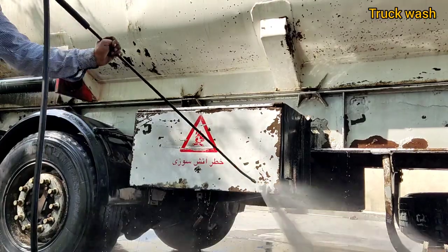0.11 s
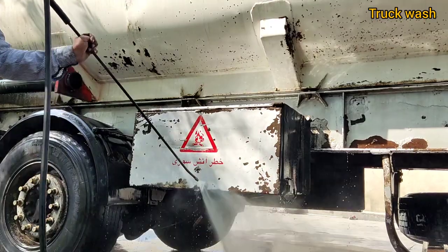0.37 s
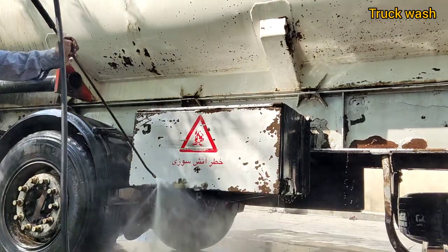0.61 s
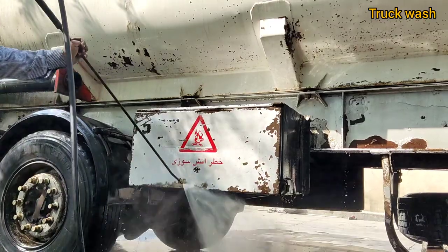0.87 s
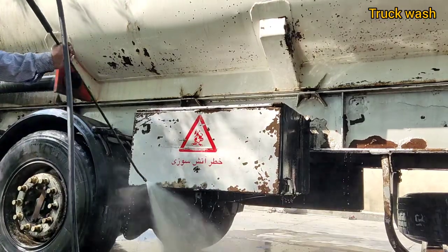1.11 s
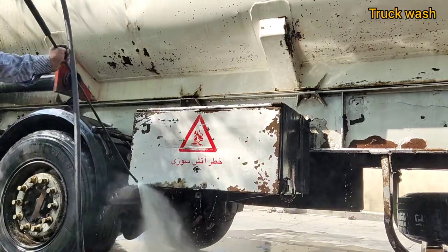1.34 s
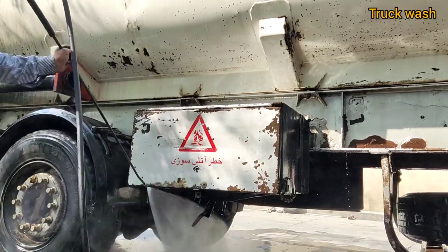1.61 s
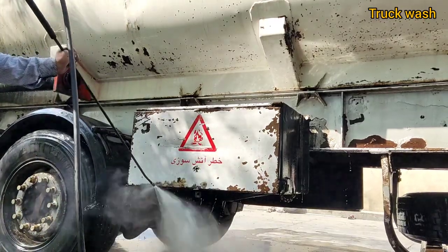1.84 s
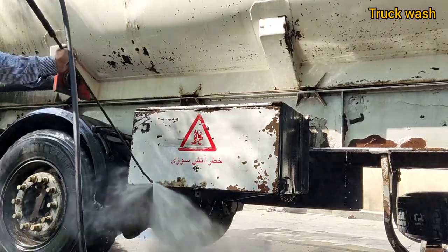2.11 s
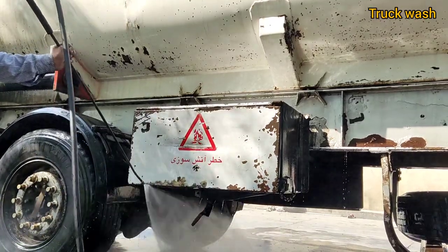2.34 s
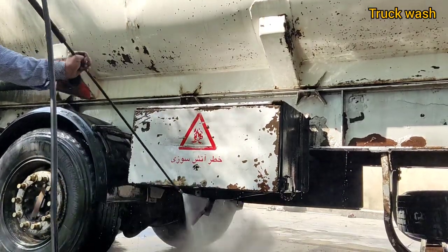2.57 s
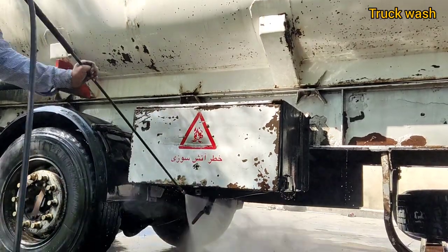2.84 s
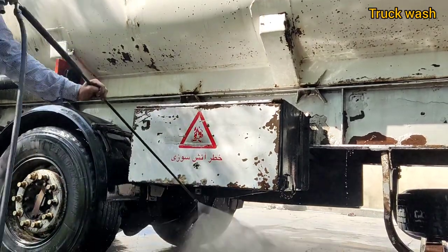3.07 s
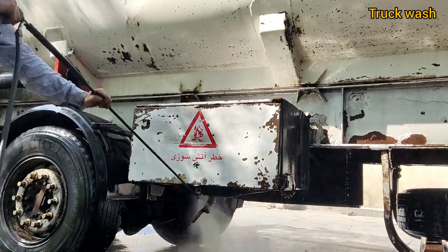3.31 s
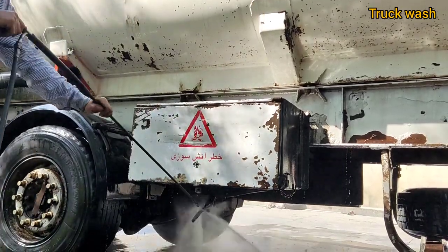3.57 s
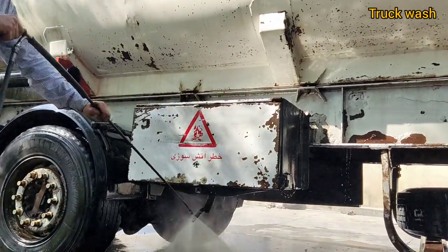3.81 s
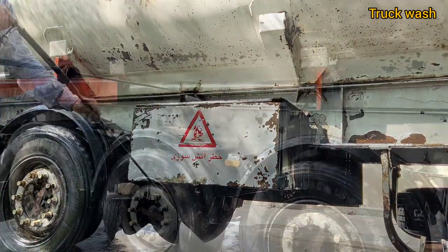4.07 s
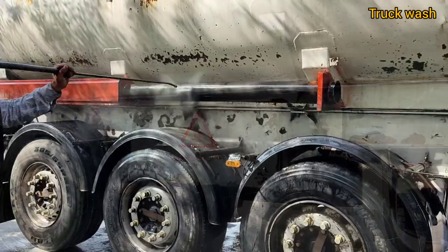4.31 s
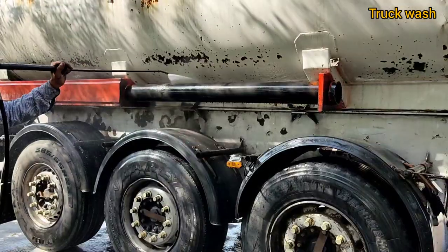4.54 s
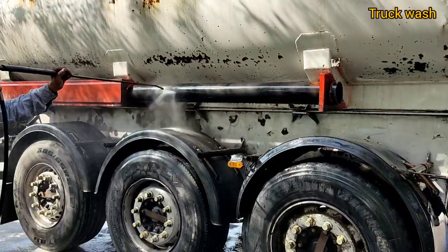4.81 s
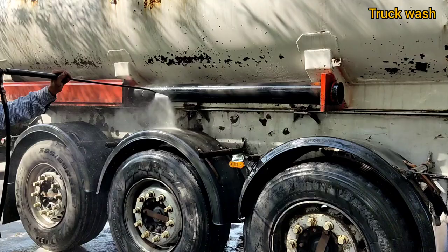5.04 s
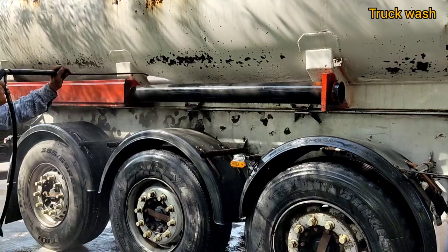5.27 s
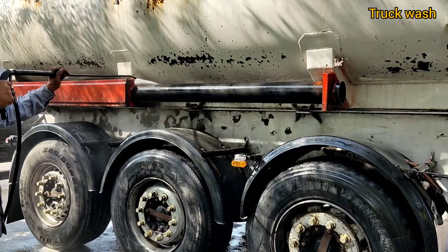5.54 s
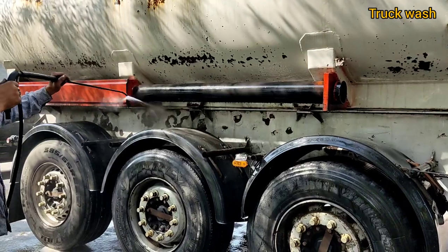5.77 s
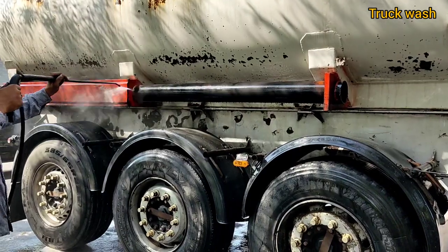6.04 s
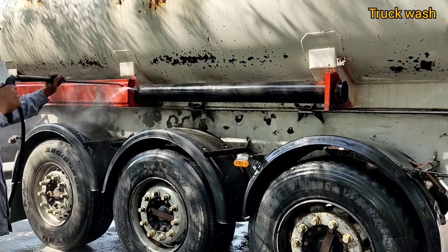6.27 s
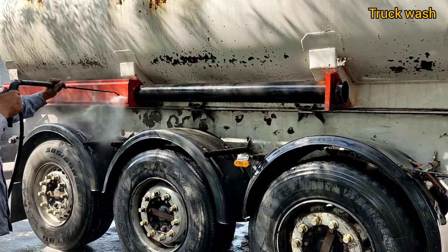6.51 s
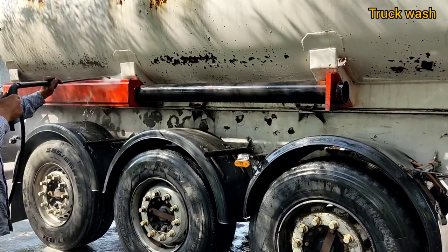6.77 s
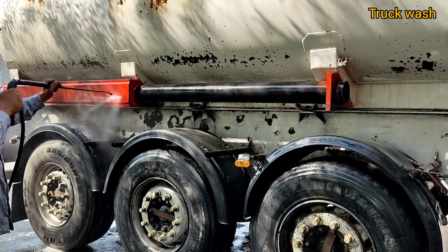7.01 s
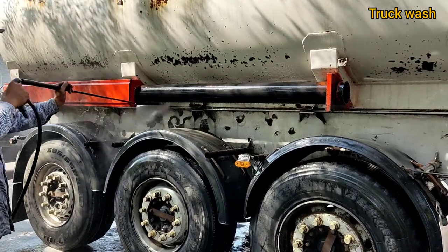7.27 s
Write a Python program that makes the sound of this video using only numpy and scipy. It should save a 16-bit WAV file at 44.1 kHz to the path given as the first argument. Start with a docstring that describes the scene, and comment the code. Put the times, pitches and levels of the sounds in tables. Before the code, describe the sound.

A high-pressure water jet hisses loudly for the whole 7.4 seconds, bright and piercing in the high treble, with rough splash beneath. From 0 to 4 s it sweeps a sheet-metal box on a truck: drumming and hollow booms swell and fade, strongest around 1 s, 2.7 s and 3 s, where a hollow resonance glides upward. The hiss flickers, with a clear brief drop near 2.2 s. Dull soft knocks on steel come at 2.65 and 3.4 s; a faint unsteady pump drone and low rumble lie behind, and wet ground reflects the spray. Around 4.0-4.2 s the sound blends into a second standpoint without the pump drone. The jet then brushes a steel beam in quick passes, drumming notably near 4.8, 5.7, 6.0, 6.4 and 7.0 s, the hiss surging at the end. Close, wide stereo, lightly clipped peaks.

```python
"""A pressure washer jet sweeps over a steel truck, heard from two standpoints one after the other.
Its nozzle is shaped noise: direct with a lag between the sides, echoed off wet ground, and scattered.
Where the fan of water lands, noise bands splash, drum and boom on steel: a sheet-metal box, then a beam.
Decaying sines knock on the steel; pump orders (first standpoint), a low hum and noise rumble lie behind."""
import sys
import numpy as np
from scipy import signal
from scipy.fft import rfft, irfft
from scipy.io import wavfile
from scipy.ndimage import uniform_filter1d, map_coordinates

SR = 44100
rng = np.random.default_rng(int(sys.argv[2]) if len(sys.argv) > 2 else 0)


def transcribe(signal):
    """Save signal, clipped to [-1, 1], as a 16-bit WAV file at the path in sys.argv[1]."""
    frames = np.atleast_2d(signal).T
    limited = np.clip(frames, -1, 1)
    pcm = np.round(limited * 32767).astype(np.int16)
    wavfile.write(sys.argv[1], SR, pcm)


def how_loud(loudness_db):
    """Turn decibels into a plain amplitude multiplier (0 dB gives 1, 20 dB gives 10)."""
    steps = np.asarray(loudness_db, float) / 20
    return 10 ** steps


N = 325458
# passage from the first standpoint to the second: start_s, end_s
MOVE_S = (4, 4.16)
SIZE, HOP = 1024, 256  # STFT window and hop, samples
HZ = np.fft.rfftfreq(SIZE, 1 / SR)[:, None]
FRAME_S = np.arange(N // HOP + 2) * HOP / SR
MOVED = np.interp(FRAME_S, MOVE_S, [0, 1])


def curves(rows):
    """Each column after the time, one value per frame."""
    s, *cols = np.transpose(rows)
    return [np.interp(FRAME_S, s, c) for c in cols]


def along(points):
    """(hz, value) points read on a log frequency axis."""
    hz, value = np.transpose(points)
    return np.interp(np.log(HZ + 1), np.log(hz + 1), value)


def blend(first, second):
    """The first standpoint passes into the second."""
    return first * (1 - MOVED) + second * MOVED


def colour(spectra):
    """Gain per frequency and frame that keeps the rms of white noise; one spectrum per standpoint."""
    first, second = (how_loud(2 * along(s)) for s in spectra)
    return np.sqrt(blend(first / first.mean(), second / second.mean()))


def wobble(knots_per_s):
    """A smooth random curve through normal knots."""
    knots = rng.standard_normal(int(FRAME_S[-1] * knots_per_s) + 4)
    return map_coordinates(knots, [FRAME_S * knots_per_s])


def noise():
    """Short-time spectra of two white noises."""
    white = rng.standard_normal((2, len(FRAME_S) * HOP - HOP))
    return signal.stft(white, nperseg=SIZE, noverlap=SIZE - HOP)[2]


def patches(spread_db, bins, frames):
    """Random gain that is smooth over some bins and frames."""
    field = rng.standard_normal((len(HZ), len(FRAME_S)))
    field = uniform_filter1d(field, bins, 0)
    field = uniform_filter1d(field, frames, 1)
    return how_loud(spread_db * field / field.std())


def delay(samples):
    """The phase turn of a delay."""
    return np.exp(-2j * np.pi * HZ * samples / SR)


def bell(s, half_s):
    """A swell around s, down to 1/e at half_s on either side."""
    edge = 2.76  # 2 is a soft swell, more is a fan with firmer edges
    return np.exp(-np.abs((FRAME_S - s) / half_s) ** edge)


def jet():
    """Passes over the steel drive its sounds; the jet flutters as a whole, and each part on its own."""
    # base levels, splash while only grazing the steel: time_s, hiss_db, splash_db
    base = [(0, -14.5, -30.5), (.2, -13, -33.5), (.6, -13, -29.5), (1.1, -13, -32.5), (1.5, -14.5, -32.5),
            (2, -13.5, -29.5), (2.6, -12, -29.5), (3.1, -12.5, -29.5), (3.4, -13.5, -30), (3.9, -15, -31.5),
            (4.07, -16, -31), (4.25, -15.5, -34.5), (4.47, -15, -33), (4.55, -13, -32), (4.9, -12.5, -31),
            (5.5, -13.5, -31.5), (6.2, -12.8, -29), (6.7, -14, -31), (7.2, -14, -28.5), (7.38, -11.5, -31)]
    # the jet turns away for a moment: centre_s, half_length_s, hiss_db, splash_db
    dips = [(0.36, 0.063, -1, -0.5), (.83, .025, -2, -1.5), (1.616, 0.032, 0, -2.5),
            (1.952, 0.018, -2.5, -1), (2.182, 0.052, -2.5, -6), (2.232, 0.03, -7, -5),
            (2.876, 0.054, -0.5, -3.5), (3.18, 0.034, -1.5, -1.5), (3.556, .04, -2.5, -4.5),
            (5.298, .05, -1.5, -1.5), (5.99, 0.046, -2.5, -2.5), (6.215, .03, -1.5, -2.5),
            (6.784, 0.019, -3, -3)]
    # base rumble of the yard: time_s, level_db
    yard = [(0, -49), (.6, -44.5), (1.55, -46.5), (1.75, -40.5), (2.4, -42), (3.45, -46.5), (4.2, -47.5),
            (4.6, -51.5), (5.3, -49), (5.8, -51.5), (7.38, -49)]
    # colour between the sides, one list per standpoint: hz, left_minus_right_db
    tilt = ([(60, -3.5), (300, -4), (600, -4.5), (950, -2), (1500, -5.5), (2400, -3), (3800, -0.5),
            (6200, 7), (8000, -1.5), (10000, 0), (12000, 7), (14000, -5.5)], [(60, -2.5), (300, -4),
            (1000, -2.3), (2400, -2), (4400, 8.5), (6200, 2.5), (8500, -4), (10500, 3.5), (12000, 4.5),
            (14000, 6.5)])
    graze_drum_db, graze_boom_db = -50.5, -60.5
    splash_follows, rumble_follows = 0.23, 0.15  # dB per dB of drumming

    hiss_db, splash_db = curves(base)
    struck_db, hollow_db = contact()
    hiss_db = hiss_db + sum(db * bell(s, half_s) for s, half_s, db, _ in dips)
    splash_db = splash_db + sum(db * bell(s, half_s) for s, half_s, _, db in dips)

    flutter = wobble(25)
    hiss_db = hiss_db + 0.29 * flutter + 0.24 * wobble(50) + 0.6 * wobble(7)
    hiss = how_loud(hiss_db) * nozzle(struck_db)
    splash_db = splash_db + splash_follows * struck_db + 0.88 * flutter + 0.23 * wobble(9.1)
    drum_db = graze_drum_db + struck_db + 1.0 * flutter + 0.8 * wobble(12)
    boom_db = graze_boom_db + hollow_db + 0.47 * flutter + 0.98 * wobble(19)
    rumble_db = curves(yard)[0] + rumble_follows * struck_db + 1.5 * wobble(8) + 0.64 * wobble(4.1)

    pair = hiss + steel(splash_db, drum_db, boom_db, rumble_db)
    half_tilt_db = blend(*map(along, tilt)) / 2
    pair = pair * how_loud(np.array([half_tilt_db, -half_tilt_db]))
    return signal.istft(pair, nperseg=SIZE, noverlap=SIZE - HOP)[1][:, :N]


def nozzle(struck_db):
    """A point of hiss reaches the two sides at different times, again off the ground, and scattered."""
    # lance, before veiling: time_s, direct_share_0_to_1, left_lag_samples, echo_0_to_1, echo_delay_samples
    lance = [(0, .45, .5, .3, 26), (.22, .5, .2, .3, 26), (.42, .45, -1.7, .2, 27.5),
             (.6, .5, 4.3, .8, 26.7), (.95, .6, 4.2, .8, 26.5), (1.17, .5, 5.3, .7, 25),
             (1.21, .5, 5.6, .3, 50), (1.45, .6, 5.5, .7, 50), (1.6, .7, 5.3, 1, 50.2),
             (1.9, .6, 5.2, .75, 49.3), (2.25, .7, 5, 1, 50), (2.4, .6, 4.5, .2, 49), (3, .6, 3.4, .2, 48),
             (3.15, .4, -1.6, .2, 47), (3.8, .3, -1.5, .2, 48), (4.2, .08, 0, 0, 48),
             (4.6, .18, 2.6, 0, 48), (5.1, .25, 3.9, 0, 48), (5.7, .3, 3.9, 0, 48), (6.1, .17, 3.9, 0, 48),
             (7.38, .22, 4.2, 0, 48)]
    # how well direct hiss stands out, one list per standpoint: hz, share_factor
    direct_factor = ([(5500, .31), (7500, .28), (9500, .94), (11500, .55), (13500, .94)], [(5300, 1.3),
                     (5900, 3.2), (6700, .7), (7500, .4), (10000, .76), (13500, .4)])
    # relative hiss spectrum, one list per standpoint: hz, level_db_per_hz
    hiss_spectra = ([(4480, -33.5), (5600, -12), (6200, -10), (7000, -5.5), (7800, -4), (8500, 1),
                     (9000, -0.1), (9700, -2.5), (10500, -2), (11500, -7), (12700, -10), (14000, -13)],
                     [(4480, -33), (5600, -15), (6200, -13.5), (7000, -8.5), (7800, -3.5), (8500, 1),
                     (9000, -1), (9700, -6.5), (10500, -6.5), (11500, -9), (12700, -12), (14000, -13)])
    veil_from_db, hides_per_db = 10.5, .17

    share, lag, echo, late = curves(lance)
    # spray thrown back off the box veils the direct hiss
    veiled = np.clip(1 - hides_per_db * (struck_db - veil_from_db), .35, 1)
    clear = blend(veiled, 0.78)
    echo = echo * clear ** 2
    share = np.clip(share * clear * blend(*map(along, direct_factor)), 0, .95)

    scattered, direct = noise(), noise()[0]
    direct = direct * (1 + echo * delay(late)) / np.sqrt(1 + echo ** 2)
    scattered = scattered * (1 + .25 * echo * delay(late))  # the ground returns part of this too
    sides = direct * [delay(lag / 2), delay(-lag / 2)]
    pair = np.sqrt(share) * sides + np.sqrt(1 - share) * scattered
    return pair * colour(hiss_spectra) * patches(1.31, bins=11, frames=9)


def contact():
    """How far drumming and boom stand over grazing, in dB: the powers of the passes add."""
    # fan of water sweeps across steel, dB over grazing: centre_s, half_length_s, drum_db, boom_db
    passes = [(.101, .2, 8, 2), (.391, .16, 8.5, 6), (0.88, .02, 11, 11), (0.995, 0.023, 17.5, 19),
              (.999, 0.15, 13, 17.5), (1.38, 0.16, 9.5, 13.5), (1.728, 0.098, 14, 17),
              (2.012, 0.1, 14.5, 17.5), (2.357, 0.073, 16.5, 17), (2.41, 0.22, 10.5, 12),
              (2.564, .039, 13, 5), (2.671, 0.026, 19.5, 26), (2.739, 0.26, 11.5, 18),
              (2.983, 0.068, 23, 17), (3.17, 0.21, 14, 12), (3.622, 0.016, 9, 9), (3.64, .17, 10, 12.5),
              (4.038, 0.16, 11, 12.5), (4.307, .055, 10, 14.5), (4.46, 0.053, 12, 14.5),
              (4.64, 0.084, 12.5, 19), (4.819, 0.039, 15, 20.5), (5.004, 0.072, 13, 18),
              (5.156, 0.048, 14, 12), (5.307, 0.048, 12, 9), (5.384, 0.031, 15, 20), (5.53, 0.071, 9.5, 5),
              (5.696, .093, 17, 17.5), (5.85, 0.027, 8, 12.5), (6.013, .14, 18, 13.5),
              (6.253, .072, 11, 15.5), (6.38, 0.092, 16, 9), (6.454, 0.027, 18.5, 20),
              (6.807, 0.061, 17, 17), (7.002, 0.047, 18, 14.5), (7.37, 0.068, 14.5, 22)]
    drum = 1 + sum(how_loud(2 * db) * bell(s, half_s) for s, half_s, db, _ in passes)
    boom = 1 + sum(how_loud(2 * db) * bell(s, half_s) for s, half_s, _, db in passes)
    return 10 * np.log10(drum), 10 * np.log10(boom)


def steel(splash_db, drum_db, boom_db, rumble_db):
    """Water on metal over the rumble of the yard: alike on both sides in the bass, apart in the treble."""
    # relative spectra, one list per standpoint: hz, level_db_per_hz
    splash_spectra = ([(1440, -17), (1800, -5.5), (2100, -7), (2500, -1), (2900, -1), (3400, 1), (4000, -1),
                       (4700, 2), (5300, 0), (6360, -21)], [(1440, -18.5), (1800, -4.5), (2100, -3.5),
                       (2500, -2.5), (2900, -2), (3400, -0.5), (4000, -1.5), (4700, 2), (5300, -2.5),
                       (6360, -21)])
    drum_spectra = ([(260, -51), (450, -9), (499, -4.5), (578, -8), (730, -6), (1020, 0.5), (1310, -6),
                     (1650, -3.5), (2140, -10), (3630, -120)], [(260, -40), (450, -0.5), (502, -1.5),
                     (648, 2), (775, -5.5), (818, 1.5), (1000, 1.5), (1140, -4), (1460, -1), (1650, -3.5),
                     (2140, -28), (3630, -120)])
    boom_spectra = ([(100, -35), (175, -1.5), (215, -2.5), (247, -1), (302, 0), (410, -3.5), (530, -24),
                     (900, -120)], [(100, -42), (175, -12.5), (193, -7), (232, 3), (323, 0.5), (361, -14),
                     (410, -16), (530, -31), (900, -120)])
    # relative rumble spectrum, both standpoints: hz, level_db_per_hz
    rumble_spectrum = [(8, -14), (18, -3), (29, 1), (40, -5), (62, -17), (100, -11), (160, -12.5),
                       (190, -41)]
    # correlation of the sides, one list per standpoint: hz, likeness
    alike = ([(60, 0.9), (300, 0.91), (700, 0.63), (1500, 0.38), (2600, 0.63), (3500, 0.14), (3900, 0.65),
             (4250, 0.63), (4550, .05), (5000, 0.2), (5400, .2)], [(60, 1), (300, 1), (700, 0.88),
             (1400, 0.82), (2200, 0.49), (3300, 0.39), (5100, 0.3), (5800, 0.67)])
    # struck point, lag in the treble: time_s, left_lag_samples
    impact = [(0, 1), (.42, -2), (.6, 7.5), (.85, 8), (.95, -3), (1.08, 1.5), (1.18, 4.5), (2.52, 6),
              (2.62, 3), (4.2, 1.5), (5, 0.5), (7.38, 4.5)]
    bend_hz = 3850  # below this the lag shrinks in proportion to frequency

    power = (how_loud(splash_db) * colour(splash_spectra) * patches(2.08, bins=5, frames=10)) ** 2
    power += (how_loud(drum_db) * colour(drum_spectra) * patches(2.1, bins=3, frames=12)) ** 2
    power += (how_loud(boom_db) * colour(boom_spectra) * patches(1.5, bins=2, frames=11)) ** 2
    power += (how_loud(rumble_db) * colour((rumble_spectrum, rumble_spectrum))) ** 2
    power += hollows()

    a, b = noise() * np.sqrt(power)
    turn = np.arccos(np.clip(blend(*map(along, alike)), -1, 1)) / 2
    same, apart = np.cos(turn) * a, np.sin(turn) * b
    half_lag = delay(curves(impact)[0] / 2 * np.minimum(HZ / bend_hz, 1))
    return np.array([(same + apart) * half_lag, (same - apart) * half_lag.conj()])


def hollows():
    """Power gain of a resonance that glides while the jet crosses each hollow."""
    # half length and half width reach to 1/e of the power:
    # centre_s, half_length_s, first_hz, last_hz, half_width_hz, level_db
    openings = [(3, 0.067, 755, 1390, 420, -26.5), (3.15, 0.22, 1000, 1610, 300, -34),
                (3.193, 0.25, 2450, 2710, 292, -31.5), (4.016, 0.044, 2700, 2730, 180, -28.5)]
    power = 0
    for s, half_s, first_hz, last_hz, width_hz, db in openings:
        u = (FRAME_S - s) / half_s
        centre_hz = first_hz + (last_hz - first_hz) * np.clip(.5 + u / 3, 0, 1)
        shape = np.exp(-((HZ - centre_hz) / width_hz) ** 2 - u ** 2)
        power = power + how_loud(2 * db) * shape * SR / 4 / width_hz
    return power


def knocks():
    """Dull knocks on the steel: one decaying mode each, struck softly."""
    # level ahead of the soft attack: start_s, mode_hz, level_db, t60_s
    strikes = [(2.655, 312, -25.5, .16), (3.4, 132, -23.5, .12)]
    attack_s = 0.0072
    out, t = np.zeros(N + SR), np.arange(SR // 4) / SR
    for s, hz, db, t60_s in strikes:
        envelope = how_loud(db - 60 * t / t60_s) * (1 - np.exp(-t / attack_s))
        out[round(s * SR):][:len(t)] += envelope * np.sin(2 * np.pi * hz * t)
    return out[:N]


def pump():
    """Unsteady orders of the pump, heard at the first standpoint."""
    # mean level of each order: multiple, level_db
    orders = [(3, -60), (4, -58), (6, -59), (9, -57.5), (16, -67.5), (20, -70)]
    pump_hz = 24.8
    t = np.arange(N) / SR
    turn = 2 * np.pi * pump_hz * t + np.interp(t, FRAME_S, 0.25 * wobble(1.5))
    out = np.zeros(N)
    for k, db in orders:
        level = np.interp(t, FRAME_S, (1 - MOVED) * how_loud(db + 2.4 * wobble(2.8)))
        out += level * np.sin(k * turn + rng.uniform(0, 2 * np.pi))
    return out


def hum():
    """A very low tone that wavers in pitch and level."""
    mean_hz, mean_db = 28.8, -52.5
    t = np.arange(N) / SR
    level = np.interp(t, FRAME_S, how_loud(mean_db + 5.4 * wobble(3)))
    waver_rad = np.interp(t, FRAME_S, 1.5 * wobble(3.2))
    return level * np.sin(2 * np.pi * mean_hz * t + waver_rad)


def scene():
    """The jet, with pump, hum and knocks a little to the right."""
    low = pump() + hum() + knocks()
    return jet() + low * how_loud(np.array([[-1.8], [1.8]]))  # left, right dB


def band_limit(x):
    """A steep low-pass at the top of the band."""
    return signal.sosfilt(signal.butter(12, 15550, fs=SR, output="sos"), x)


def record(dry):
    """The loudest peaks clip ahead of a steep band limit."""
    top_hz, padded = 14230, N + 8
    clipped = np.clip(dry, -.74, .74)
    passed = np.fft.rfftfreq(padded, 1 / SR) < top_hz
    band = irfft(rfft(clipped, padded) * passed, padded)[:, :N]
    return band_limit(band)


dry = scene()
out = record(dry)
transcribe(out)
```